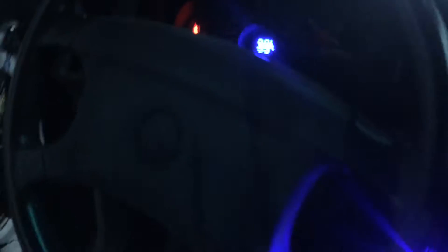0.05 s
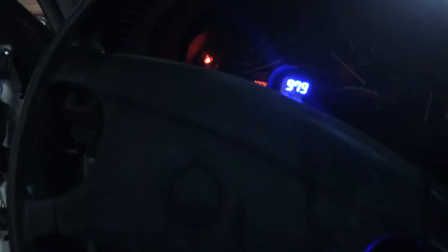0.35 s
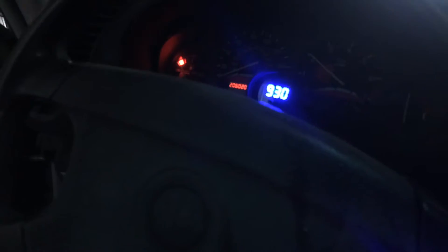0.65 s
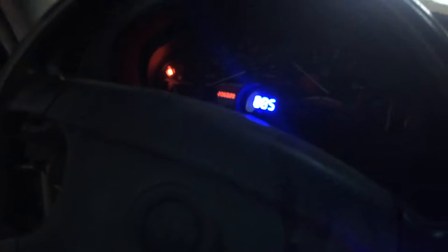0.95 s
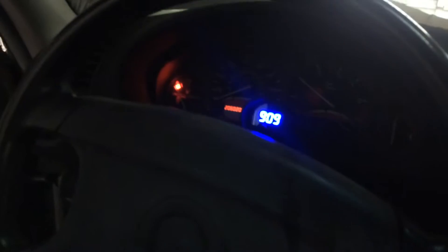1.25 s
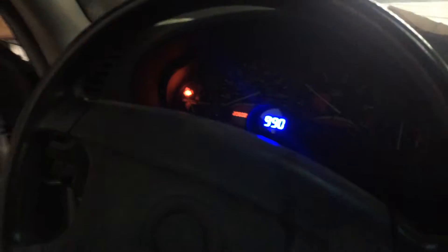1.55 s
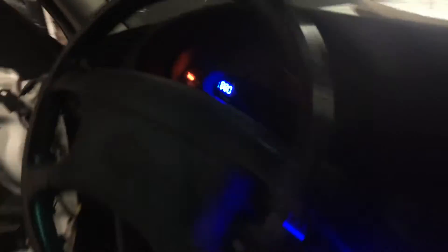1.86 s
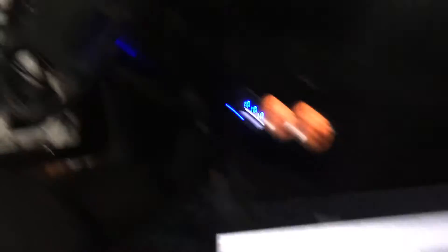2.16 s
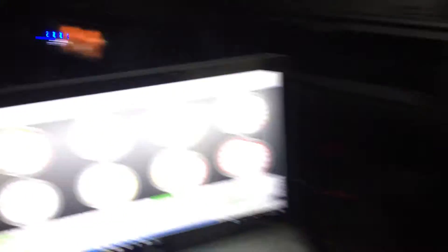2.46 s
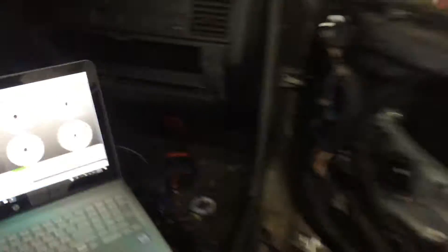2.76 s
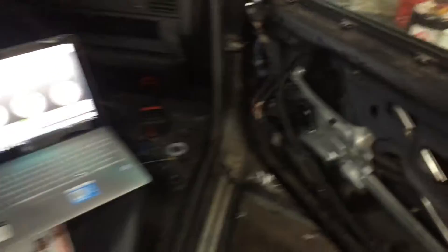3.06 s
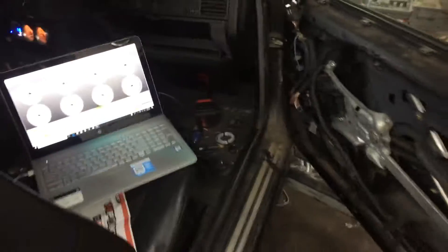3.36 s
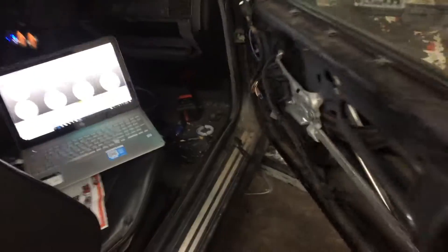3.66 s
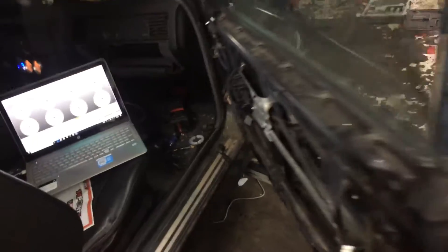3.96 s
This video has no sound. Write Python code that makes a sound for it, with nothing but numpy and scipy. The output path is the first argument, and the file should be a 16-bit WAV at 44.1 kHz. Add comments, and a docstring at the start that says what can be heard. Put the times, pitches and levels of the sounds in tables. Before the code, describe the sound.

A V8 engine idles with a lumpy, uneven rumble, heard from inside the car.

```python
"""A V8 with a lumpy cam idles in a garage, heard from the seat of a stripped car.
Its uneven exhaust pulses excite the resonances of the bare cabin while the speed hunts, with hard
thumps and misfires among them. The pipes growl; the engine bay hisses, ticks once a turn and rattles.
Halfway through, the listener turns from the steering wheel past the footwell to the open door:
the boom rises in pitch and the hiss opens up."""
import sys
import numpy as np
from scipy import signal
from scipy.fft import rfft, irfft
from scipy.io import wavfile

SR = 44100
rng = np.random.default_rng(int(sys.argv[2]) if len(sys.argv) > 2 else 0)


def materialize(psi):
    """Save the field psi as 16-bit PCM at rate SR to the path in sys.argv[1].

    A 1-D psi becomes a single channel; in a 2-D psi each row is a channel.
    """
    bounded = np.clip(np.atleast_2d(psi).T, -1, 1)
    quanta = np.round(bounded * 32767).astype(np.int16)
    wavfile.write(sys.argv[1], SR, quanta)


N = 176400
TIME = np.arange(N) / SR
FIRST_FIRING_TURN = 0.82

# Path of the listener. Each row: time in seconds, place (0 wheel, 1 footwell, 2 door).
LISTENER_PLACE = [(0, 0.033), (2.08, 0), (2.36, 0.54), (2.65, 0.54), (3.15, 1.83), (4, 1.8)]
# Hard firings. Each row: time of the crest in seconds, relative peak level in dB.
HARD_FIRINGS = [(0.074, -2), (0.163, -5.5), (0.195, -2), (0.298, -5), (0.329, -8), (0.669, -3.5),
                (0.697, -2), (0.754, 0.5), (0.965, -4.5), (1.018, -1.5), (1.152, -3), (1.234, -8),
                (1.291, -1), (1.324, -2.5), (1.409, -4.5), (1.451, -1), (1.491, -3), (1.525, 0.5),
                (1.618, -5.5), (1.656, -2.5), (1.705, -4), (1.727, -3), (1.765, 2), (1.812, -2),
                (1.845, -2), (1.976, -1), (2.021, -3), (2.202, -3.5), (2.462, -8.5), (2.595, -2),
                (2.654, -3.5), (3.171, -2.5), (3.302, -3), (3.345, -4), (3.37, -6.5), (3.422, 2.5),
                (3.492, -7), (3.527, -3.5), (3.617, 0.5), (3.683, -1.5), (3.737, -2), (3.772, -4),
                (3.8, -6.5)]


def exhaust(turns, strength_spread=0.21, jitter_s=0.0005, crossover_hz=150.5, muffler_hz=704):
    """Pulsating flow: four uneven firings a turn, with turbulent puffs, lie below a steady roar of gas."""
    # One bank is much nearer. Each entry: strength of a cylinder in dB, in firing order.
    cylinder_db = [-12.5, -2.5, -3, -12.5, 0, -22.5, -8, -3]
    # Misfires weaken the pulses for a moment. Each row: time in seconds, dip in dB.
    misfires = [(.232, -7), (0.382, -5), (.505, -3), (.575, -16), (0.913, -9.5), (1.073, -20), (1.255, -8),
                (1.874, -12.5), (2.629, -1.5), (2.722, -4.5), (2.82, -6.5), (3.855, -3), (3.927, -14.5)]
    fired_s = crank_times(turns, FIRST_FIRING_TURN, per_turn=4)
    count = len(fired_s)
    heard_s = fired_s + 0.013   # the boom takes time to build up
    misfire_db = sum(db * bump(heard_s, at, width_s=0.018) for at, db in misfires)
    # A thump takes its firing's place.
    gaps = np.prod([1 - bump(heard_s, at, width_s=0.0079) for at, _ in HARD_FIRINGS], axis=0)
    strengths = from_db(np.resize(cylinder_db, count)) + strength_spread * rng.standard_normal(count)
    train = clicks(fired_s + jitter_s * rng.standard_normal(count), gaps * from_db(misfire_db) * strengths)
    puffs = from_db(-8) * rms_one(bursts(train, decay_s=0.0099))
    rumble = from_db(-8) * rng.standard_normal(N)
    pulses = butterworth(puffs + rumble - rms_one(train), 3, crossover_hz, "low")
    roar = from_db(2.5) * butterworth(rng.standard_normal(N), 3, [crossover_hz, muffler_hz], "band")
    return pulses + roar


def cabin_boom(gas):
    """Standing waves: the cabin reinforces different frequencies of the exhaust at each place."""
    # Cabin response at three places. Each row: frequency in Hz, relative gain in dB.
    at_wheel = [(8, -45.5), (20, -20.5), (34, -18.5), (50, -9), (64, -1.5), (76, -3.5), (90, 5), (122, -16),
                (160, -21), (188, -19), (232, -22.5), (268, -37.5), (302, -30), (340, -64.5), (600, -68.5)]
    at_footwell = [(8, -67), (20, -24.5), (32, -17), (42, 8.5), (51, 9), (66, -7.5), (84, 1.5), (105, 2),
                   (150, 2.5), (192, -3), (250, -29.5), (298, -29), (360, -33.5), (600, -68.5)]
    at_door = [(8, -77), (20, -40), (32, -13), (48, -7.5), (68, -5), (97, 7.5), (132, 3), (185, -21.5),
               (240, -18), (300, -29), (360, -36), (600, -58)]
    # Swell of the boom. Each row: time in seconds, gain in dB.
    boom_level = [(0, -15), (.5, -15.5), (.85, -15), (1.3, -14), (1.7, -16), (2.1, -15), (2.33, -17),
                  (2.55, -13), (2.8, -18.5), (3.05, -16), (3.45, -15), (3.75, -17), (3.87, -17), (4, -13)]
    place, = in_time(LISTENER_PLACE)
    level_db, = in_time(boom_level)
    boom = 0
    for station, response in enumerate((at_wheel, at_footwell, at_door)):
        nearness = np.clip(1 - abs(place - station), 0, 1)
        boom += nearness * colour(gas, response)
    return from_db(level_db) * boom


def thumps(wheel_hz=76.2, door_rise_hz=22.3, gain_db=-2.52):
    """Impulse response: each hard firing is one low, band-limited thud, higher toward the door."""
    out, impulse = np.zeros(N + SR), signal.unit_impulse(SR // 8)
    place, = in_time(LISTENER_PLACE)
    for s, db in HARD_FIRINGS:
        at = int(s * SR)
        thud = band(impulse, wheel_hz + door_rise_hz * place[at] / 2, edge_ratio=1.485, order=4)
        crest = np.argmax(abs(thud))
        start = at - crest
        out[start:start + len(thud)] += from_db(db + gain_db) * thud / thud[crest]
    return out[:N]


def growl(turns, puff_s=0.0055):
    """Pipe resonance: the puff of every firing excites the hollow modes of the manifold and pipes."""
    # Each row: frequency in Hz, relative level in dB, t60 in seconds.
    pipe_modes = [(578.6, -0.5, 0.16), (632, -3, 0.14), (695.6, -6, 0.2), (722, -6, 0.2),
                  (789.4, -7.5, 0.17)]
    # Each row: time in seconds, level in dB.
    growl_level = [(0, -42.5), (.7, -49.5), (1, -48.5), (1.5, -48), (2.2, -53), (2.7, -52), (3.05, -46),
                   (3.5, -41.5), (4, -46)]
    fired_s = crank_times(turns, FIRST_FIRING_TURN, per_turn=4)
    train = clicks(fired_s, np.ones(len(fired_s)))
    rings = sum(from_db(db) * rms_one(ring(bursts(train, puff_s), hz, t60)) for hz, db, t60 in pipe_modes)
    level_db, = in_time(growl_level)
    return from_db(level_db) * rms_one(band(rings, hz=660, edge_ratio=1.38, order=2))


def rush(turns, low_cut_hz=320, flutter_db=0.82, throb_db=0.5):
    """Turbulence: fan, belts and intake make broadband noise that throbs slightly with the crank."""
    # Spectra through the cabin and the door. Each row: frequency in Hz, relative density in dB.
    cabin_spectrum = [(200, -14.5), (340, -2), (420, 5), (500, -4.5), (590, -0.5), (740, -0.5), (900, -3.5),
                      (1150, -5), (1260, -8.5), (1630, -7), (2000, -9.5), (2850, -13), (3150, -15.5),
                      (4250, -21.5), (5300, -23), (6100, -20.5), (7200, -22), (10500, -32.5),
                      (15500, -40.5)]
    door_spectrum = [(200, -2), (340, -6), (500, -1), (690, -2), (830, -6.5), (980, -6.5), (1410, -10),
                     (2100, -12), (3090, -17.5), (3680, -21), (5150, -25.5), (6400, -22.5), (9440, -34),
                     (11300, -35.5), (15500, -42.5)]
    # Each row: time in seconds, gain through the cabin in dB, gain through the door in dB.
    path_gains = [(0, -41.5, -60), (.85, -42, -54), (1.2, -41, -53), (1.6, -41, -64), (2.15, -45, -48.5),
                  (2.55, -45.5, -42.5), (2.95, -51.5, -37.5), (3.5, -49, -38), (3.8, -79, -37),
                  (4, -36, -38.5)]
    # Narrow rings of panels and pulleys. Each row: frequency in Hz, relative level in dB, t60 in seconds.
    panel_modes = [(297.6, -10.5, 0.6), (463.6, -14, 0.14), (790, -19.5, 0.062), (972, -17, 0.15),
                   (1104, -30, 0.065), (1460, -21, 0.047), (1604, -27, .07), (2442, -22, 0.082),
                   (6300, -42, .07)]
    air = 0
    for gain_db, spectrum in zip(in_time(path_gains), (cabin_spectrum, door_spectrum)):
        hiss = colour(rng.standard_normal(N), spectrum)
        hiss = rms_one(butterworth(hiss, 4, low_cut_hz, "high"))
        rings = sum(from_db(db) * rms_one(ring(rng.standard_normal(N), hz, t60))
                    for hz, db, t60 in panel_modes)
        air += from_db(gain_db) * (hiss + rings)
    return air * from_db(flutter_db * drift(hz=16) + throb_db * np.cos(2 * np.pi * turns))


def valves_and_belt(turns, tick_turn=0.54, clink_turns=(0.27, 0.46), spread_db=1.5):
    """Impact noise: valves tick and clatter and the belt drive clinks, less shielded toward the door."""
    # Valve gear and duller belt drive. Each row: frequency in Hz, relative level in dB, t60 in seconds.
    valve_modes = [(5660, -58, 0.045), (5740, -55.5, 0.06), (6230, -64, .035), (6475, -63.5, .045),
                   (11170, -68.5, .028), (11360, -69.5, .028)]
    belt_modes = [(3370, -48.5, 0.062), (2746, -50.5, 0.038), (1628, -50.5, 0.025), (1130, -61.5, 0.031)]
    # Dense clatter of the valve train. Each row: frequency in Hz, relative density in dB.
    clatter_spectrum = [(400, 8.5), (650, -6), (1200, -14), (2600, 4.5), (4500, -14), (6800, -16.5),
                        (10000, -20.5), (15500, -49.5)]
    impact_s = crank_times(turns, tick_turn, per_turn=8)
    impacts = clicks(impact_s, from_db(spread_db * rng.standard_normal(len(impact_s))))
    clatter = from_db(-54.5) * colour(bursts(impacts, decay_s=0.0096), clatter_spectrum)
    clinks = sum(ticking(turns, first, belt_modes) for first in clink_turns) / 2
    ticks = ticking(turns, tick_turn, valve_modes)
    place, = in_time(LISTENER_PLACE)
    shielding_db = -12 + 3 * place
    return from_db(shielding_db) * (clatter + ticks + clinks)


def ticking(turns, first_turn, modes, jitter_s=0.0008, spread_db=1.5):
    """Modal ringing: one contact a turn, scattered by the engine bay, excites each mode unevenly."""
    contact_s = crank_times(turns, first_turn, per_turn=1)
    out = 0
    for hz, db, t60 in modes:
        struck_s = contact_s + jitter_s * rng.standard_normal(len(contact_s))
        train = clicks(struck_s, from_db(spread_db * rng.standard_normal(len(struck_s))))
        scatter = from_db(4) * rms_one(bursts(train, decay_s=0.02))
        drive = butterworth(rms_one(train) + scatter, 1, [0.9 * hz, 1.1 * hz], "band")
        out += from_db(db) * rms_one(ring(drive, hz, t60))
    return out


def knocks(decay_s=0.044, edge_ratio=1.5):
    """Scattering: the engine bay blurs each knock of a loose part into a dying band of noise."""
    # Each row: start in seconds, centre frequency in Hz, initial level in dB.
    loose_knocks = [(.98, 1600, -44), (1.185, 1070, -42.5), (2.245, 1470, -45), (2.485, 1500, -43.5),
                    (2.88, 1470, -45), (3.465, 1300, -42)]
    out = 0
    for s, hz, db in loose_knocks:
        rattle = bursts(clicks(np.array([s]), np.ones(1)), decay_s)
        power_in_band = 2 * hz * (edge_ratio - 1 / edge_ratio) / SR
        out += from_db(db) * band(rattle, hz, edge_ratio, order=2) / np.sqrt(power_in_band)
    return out


def tink(start_s=2.968, peak_db=-49):
    """Free vibration: a small metal part, touched once, rings in a single damped mode."""
    return ring(clicks(np.array([start_s]), from_db([peak_db])), hz=8730, t60=0.06)


def garage():
    """Diffuse field: engine noise that fills the garage grows as the listener nears the door sill."""
    # Each row: frequency in Hz, relative density in dB.
    room_spectrum = [(60, -43.5), (170, 1.5), (270, -3.5), (350, -3.5), (450, -27), (1000, -26.5),
                     (4000, -32.5), (9000, -33), (15500, -53.5)]
    # Each row: time in seconds, level in dB.
    room_level = [(0, -67), (2.6, -43.5), (3.1, -40.5), (3.5, -48), (3.75, -36), (4, -39)]
    level_db, = in_time(room_level)
    return from_db(level_db) * colour(rng.standard_normal(N), room_spectrum)


def crank_times(turns, first_turn, per_turn):
    """Phase locking: times in seconds of an event that recurs at equal steps of crank angle."""
    steps = np.arange(-2 * per_turn, turns[-1] * per_turn)   # begin one engine cycle early
    return np.interp(first_turn + steps / per_turn, turns, TIME)


def clicks(times_s, sizes):
    """Impulse train with the given times and sizes."""
    out = np.zeros(N)
    inside = (times_s > 0) & (times_s < (N - 1) / SR)
    np.add.at(out, (times_s[inside] * SR).astype(int), sizes[inside])
    return out


def bursts(train, decay_s):
    """Exponential decay: each impulse becomes a dying burst of noise."""
    envelope = signal.lfilter([1], [1, -np.exp(-1 / (decay_s * SR))], train + 1e-18)
    return envelope * rng.standard_normal(N)


def ring(x, hz, t60):
    """Damped oscillator: a unit impulse starts a sine of height 1 that falls 60 dB in t60 seconds."""
    radius, angle = from_db(-60 / (t60 * SR)), 2 * np.pi * hz / SR
    return signal.lfilter([0, np.sin(angle)], [1, -2 * radius * np.cos(angle), radius ** 2], x + 1e-18)


def colour(x, response, size=2 ** 14):
    """Minimum-phase filtering by a response in Hz and dB; the result has rms 1."""
    hz, db = np.transpose(response)
    bin_hz = np.maximum(np.arange(size // 2 + 1) * SR / size, 1)
    gain = from_db(np.interp(np.log(bin_hz), np.log(hz), db))
    cepstrum = irfft(np.log(gain))
    cepstrum[1:size // 2] *= 2   # folding the cepstrum makes the filter causal
    cepstrum[size // 2 + 1:] = 0
    impulse_response = irfft(np.exp(rfft(cepstrum)))
    return rms_one(signal.fftconvolve(x, impulse_response)[:N])


def butterworth(x, order, hz, kind):
    """Maximally flat filter: low-, high- or band-pass."""
    return signal.sosfilt(signal.butter(order, hz, kind, fs=SR, output="sos"), x)


def band(x, hz, edge_ratio, order):
    """Band-pass with its geometric centre at hz."""
    return butterworth(x, order, [hz / edge_ratio, hz * edge_ratio], "band")


def drift(hz):
    """Random fluctuation: low-passed noise with rms 1."""
    return rms_one(butterworth(rng.standard_normal(N + SR), 2, hz, "low")[SR:])


def bump(s, at, width_s):
    """Gaussian window of height 1 around a moment."""
    return np.exp(-0.5 * ((s - at) / width_s) ** 2)


def in_time(rows):
    """Linear interpolation of each column after the time to every sample."""
    s, *columns = np.transpose(rows)
    return [np.interp(TIME, s, column) for column in columns]


def from_db(db):
    """Decibels to amplitude ratio."""
    return 10 ** (np.asarray(db) / 20)


def rms_one(x):
    """Normalisation to rms 1."""
    return x / np.sqrt(np.mean(x ** 2) + 1e-20)


def scene():
    """Superposition: all sources add in one channel, and the crank paces those that repeat."""
    # The hunting idle. Each row: time in seconds, speed in turns per minute.
    engine_speed = [(0, 1004), (.35, 977), (.75, 886), (1.1, 899), (1.5, 994), (1.85, 1002), (2.2, 933),
                    (2.5, 941), (2.85, 894), (3.25, 945), (3.6, 1019), (4, 1034)]
    rpm, = in_time(engine_speed)
    turns = np.cumsum(rpm) / 60 / SR
    firing = cabin_boom(exhaust(turns)) + thumps() + growl(turns)
    engine_bay = rush(turns) + valves_and_belt(turns) + knocks()
    return (firing + engine_bay + tink() + garage())[None]


def record(dry):
    """Band limiting: a steep elliptic low-pass removes the highest treble."""
    cutoff_hz = 15800
    return signal.sosfilt(signal.ellip(10, 0.1, 80, cutoff_hz, fs=SR, output="sos"), dry)


dry = scene()
out = record(dry)
materialize(out)
```